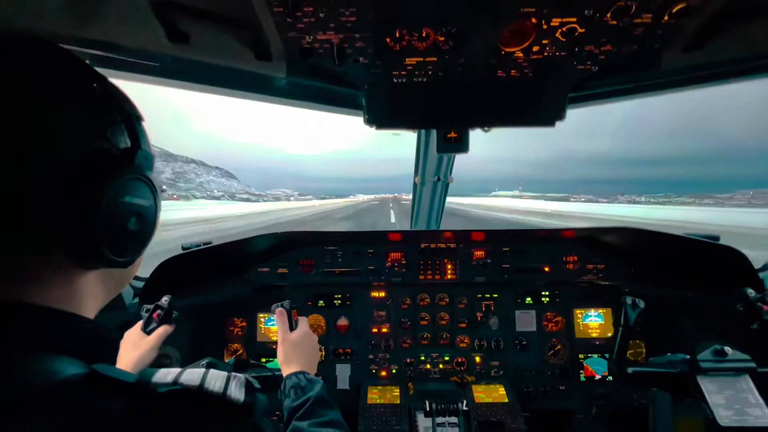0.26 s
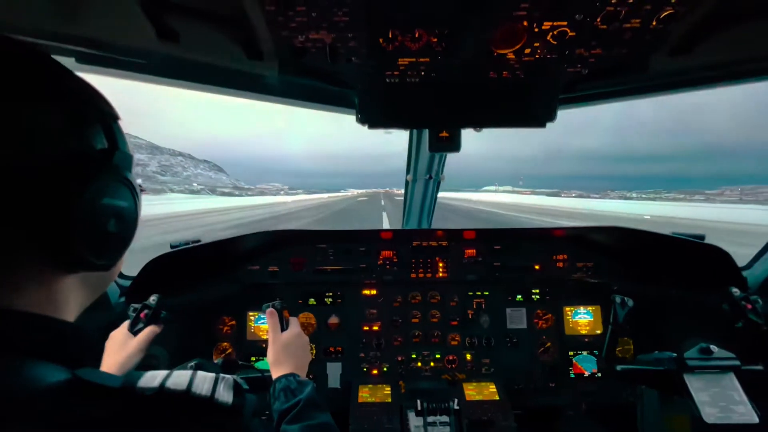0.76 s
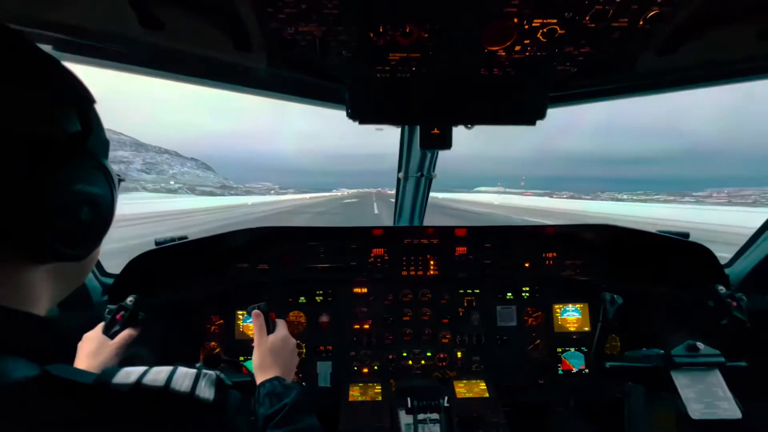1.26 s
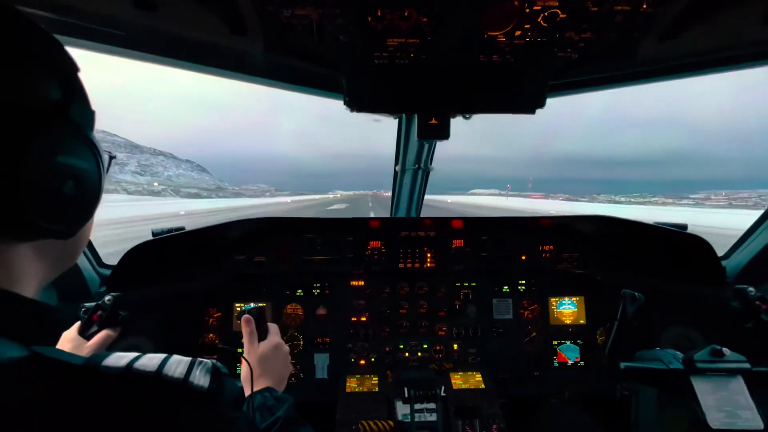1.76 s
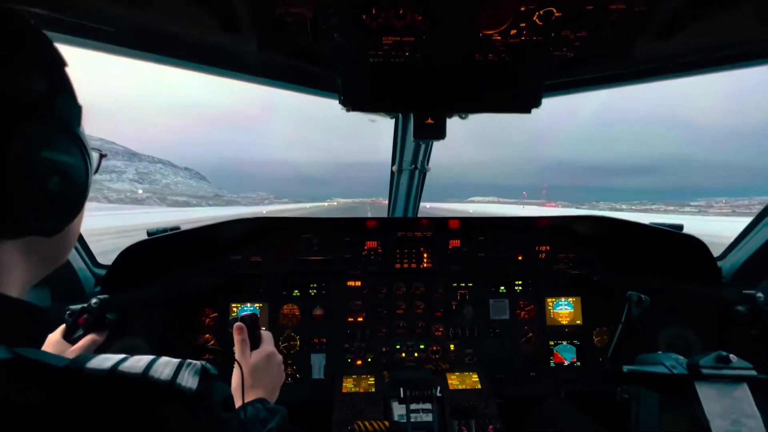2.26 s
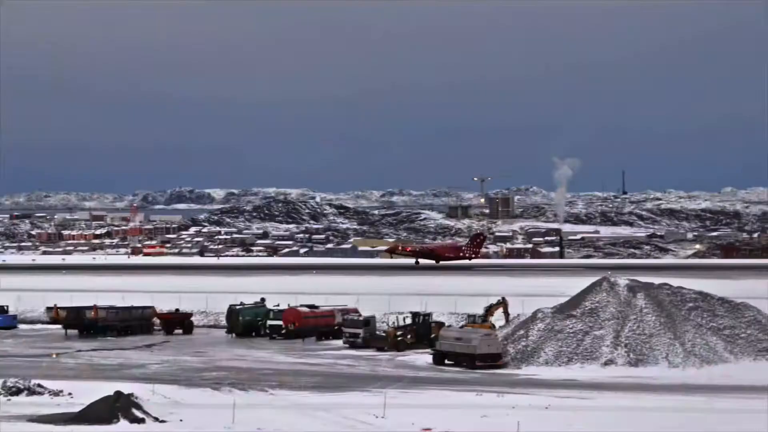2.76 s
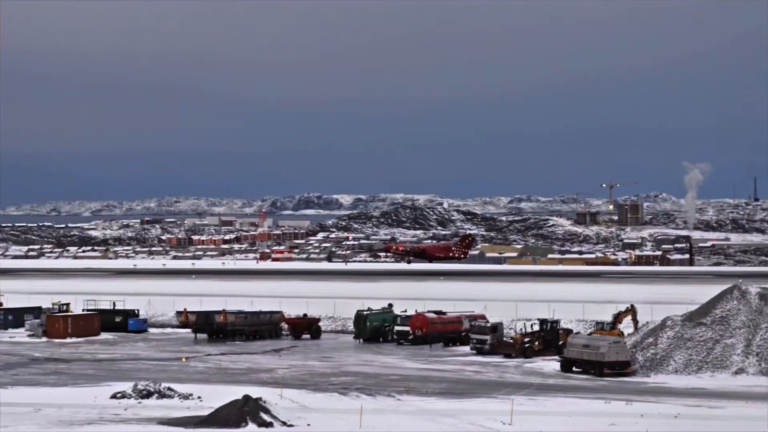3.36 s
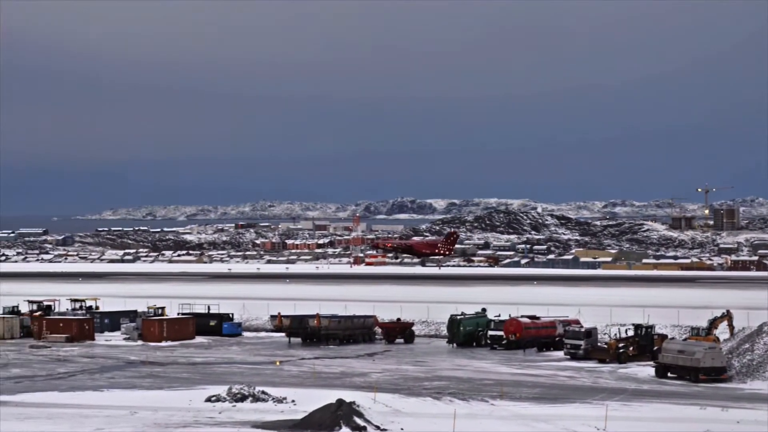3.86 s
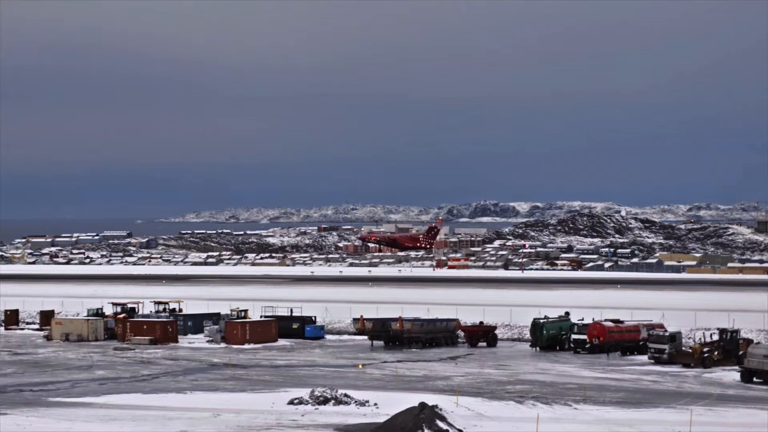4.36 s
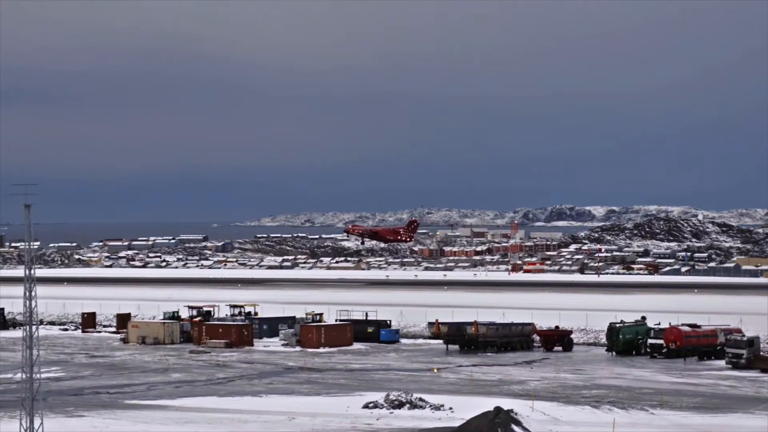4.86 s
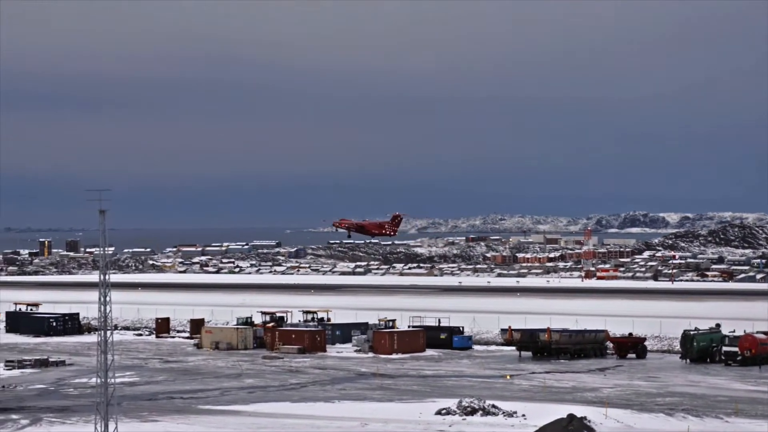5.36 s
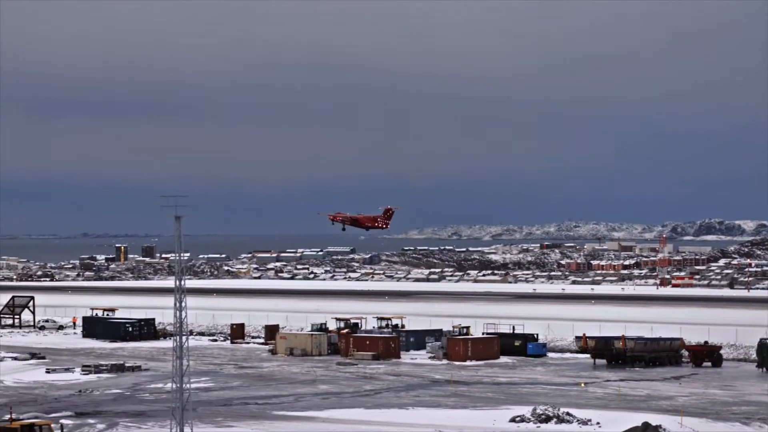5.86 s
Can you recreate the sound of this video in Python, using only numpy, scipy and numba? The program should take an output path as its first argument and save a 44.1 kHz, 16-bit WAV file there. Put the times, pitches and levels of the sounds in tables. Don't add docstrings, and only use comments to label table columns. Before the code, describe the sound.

Inside a small turboprop cockpit, a loud deep propeller hum beats slowly from the first moment, under steady air rush and a thin, hissing high whine. Runway rumble shakes the low end, then fades. A bump and sharp loose-fitting tick come early, followed by two faint ticks. Later, a blended outside layer of the same aircraft passing sinks in pitch. Stereo recorder behind the seats.

```python
import sys
import numpy as np
from scipy import signal
from scipy.fft import rfft, irfft
from scipy.io import wavfile
from scipy.ndimage import uniform_filter1d
from numba import njit

SR = 44100
rng = np.random.default_rng(int(sys.argv[2]) if len(sys.argv) > 2 else 0)


def invert_db(x):
    u = np.asarray(x, float) / 20
    return 10 ** u


def store_wav(level_fs):
    pcm = np.round(np.clip(np.atleast_2d(level_fs), -1, 1) * 32767)
    wavfile.write(sys.argv[1], SR, pcm.T.astype(np.int16))


N = 269892

# (time [s], faster blade rate [Hz], slower blade rate [Hz], level [dB], tilt [dB per multiple])
CABIN = [(0.0, 80.681, 79.512, 0.0, 0.0), (1.5, 80.533, 79.486, -3.9, -2.7),
         (3.0, 80.548, 79.516, -2.8, 1.3), (4.5, 80.623, 79.526, -1.6, -0.5),
         (6.12, 80.467, 79.486, -1.8, -2.9)]
# (time [s], slower blade rate as heard [Hz], level [dB], ground echo delay [ms], tilt [dB per multiple])
PASSING = [(1.0, 79.576, -4.7, 8.44, 4.3), (2.0, 79.567, -5.7, 8.73, 5.3), (2.8, 79.222, -5.5, 9.78, 7.6),
           (3.4, 79.296, -2.7, 8.41, 7.4), (4.0, 78.679, 0.0, 6.68, -3.9), (4.6, 77.895, 0.2, 4.65, -8.0),
           (5.2, 77.58, -9.5, 3.03, 2.7), (5.7, 76.977, -8.9, 2.65, 6.8), (6.12, 76.762, -9.4, 3.11, 6.0)]


def level(x, db):
    return x * invert_db(db) / np.sqrt(np.mean(x ** 2))


def curves(table):
    s, *columns = np.transpose(table)
    return [np.interp(np.arange(N) / SR, s, c) for c in columns]


def on_log_hz(table, hz):
    points_hz, values = np.transpose(table)
    return np.interp(np.log(hz), np.log(points_hz), values)


@njit
def svf(x, hz, width):
    y, b, l = np.empty(len(x)), 0., 0.
    g, k = np.tan(np.pi * hz / SR), width / hz
    for i in range(len(x)):
        v = (b + g * (x[i] - l)) / (1 + g * (g + k))
        b, l, y[i] = 2 * v - b, l + 2 * g * v, k * v
    return y


def walk(rate_hz):
    hold, coarse = int(SR / rate_hz / 64), N // 64 + 2
    held = np.repeat(rng.standard_normal(coarse // hold + 1), hold)
    slow = uniform_filter1d(uniform_filter1d(held, hold), hold)[:coarse]
    return 1.3 * np.interp(np.arange(N) / 64, np.arange(coarse), slow)


def ports(sources, share):
    lag_samples = 8
    common = np.array([np.roll(sources[0], lag_samples), sources[0]])
    return np.sqrt(share) * common + np.sqrt(1 - share) * sources[1:]


def rotors():
    pass_gap_hz = 1.001
    fast, slow = curves(CABIN)[:2]
    far = curves(PASSING)[0]
    return np.array([fast, slow, far, far + pass_gap_hz])


def blade_tone(row, late_cycles):
    ground_share, far_wing_ms = .713, .571
    (k, *db), hz = row, rotors()
    cabin_db, cabin_tilt_db = curves(CABIN)[2:]
    pass_db, echo_ms, pass_tilt_db = curves(PASSING)[1:]
    cycles = k * np.cumsum(hz, axis=1) / SR - np.c_[list(late_cycles)]
    spin = invert_db(np.c_[db]) * np.exp(2j * np.pi * cycles)
    echo_s = (echo_ms + np.array([[0], [far_wing_ms]])) / 1000
    combed = 1 + ground_share * np.exp(-2j * np.pi * k * hz[2:] * echo_s)
    cabin = invert_db(cabin_db + (k - 1) * cabin_tilt_db) * spin[:2].sum(axis=0)
    passing = invert_db(pass_db + (k - 1) * pass_tilt_db) * (combed * spin[2:]).sum(axis=0)
    return cabin + passing


def propellers():
    # (blade multiple, cabin faster [dB], cabin slower [dB], passing slower [dB], passing faster [dB])
    blade_db = [(1, -13.5, -12.5, -12.3, -15), (2, -27, -21.5, -22, -33.5), (3, -37.5, -30.5, -42, -45.5)]
    path_cycles = [(0.4, 0.02, 0.38, 0.09), (0.3, 0.05, 0.28, 0.75), (0.99, 0.26, 0.59, 0.63)]
    blade_lag = [0.12, 0.45, 0.66]
    hold_down = .12
    out, swells, side = 0, [], np.array([[.5], [-.5]])
    for row, late, lag, pan_db in zip(blade_db, path_cycles, blade_lag, (0, -1.6, -.5)):
        pressure = blade_tone(row, late)
        power = np.abs(pressure) ** 2
        swell_db = 10 * np.log10(power / power.mean() + .03)
        swells.append(swell_db)
        gain_db = pan_db * side - hold_down * np.maximum(swell_db, -3) / row[0] ** 2
        out = out + np.sqrt(2) * invert_db(gain_db) * np.real(pressure * np.exp(-1j * lag * side))
    return out, swells[0]


def tone(turns, multiple, db, wander_db, spread, rate_hz):
    drift = walk(rate_hz) + spread * np.array([walk(rate_hz), walk(rate_hz)])
    swell = walk(rate_hz) + .6 * np.array([walk(rate_hz), walk(rate_hz)])
    return np.sqrt(2) * invert_db(db + wander_db * swell) * np.sin(2 * np.pi * multiple * turns + drift)


def overtones():
    # (blade multiple, cabin faster [dB], cabin slower [dB], passing slower [dB], passing faster [dB])
    upper_db = [(4, -45, -47.5, -46, -45), (5, -48, -50, -44.5, -40.5), (6, -45.5, -58, -50, -55),
                (7, -68, -50, -58, -62.5), (8, -59, -71, -73, -62), (9, -58, -59, -75, -66),
                (10, -53.5, -66, -73, -73), (11, -59, -64, -66, -59)]
    blades = np.cumsum(rotors(), axis=1) / SR
    near = invert_db(curves(CABIN)[2])
    far = invert_db(np.clip(curves(PASSING)[1], -5, -1))
    out = 0
    for k, *tone_db in upper_db:
        for turns, one_db, gain in zip(blades, tone_db, (near, near, far, far)):
            out = out + gain * tone(turns, k, one_db, 2.5, .6, 4)
    return out


def gearbox(turns, whine_db, gear_db):
    # (shaft multiple, level [dB])
    gears = [(43.4, -57), (45, -59), (67.4, -62), (69.1, -58), (89.7, -61), (92.3, -63), (94, -65),
             (112, -64), (130.6, -67), (296.5, -66), (304.5, -63)]
    # (blade multiple, level on it [dB], level one shaft turn below [dB])
    whine = [(77, -14, -14), (78, -10, -13), (79, -12, -11), (80, -7, -5), (81, -7, -7), (82, -4, -3),
             (83, 0, 0), (84, -3, -2), (85, -7, -8), (86, -12, -14)]
    gear_hz, whine_hz, whine_width_hz, side_hz = 1604.6, 6630., 410., 6270.
    low = sum(tone(turns, m, db, 3.2, .7, 3) for m, db in gears)
    low = low + invert_db(gear_db + 5) * tone(np.arange(N) / SR, gear_hz, -.7, 1.6, .8, 5)
    lines = 0
    for k, on_db, below_db in whine:
        lines = lines + tone(turns, 4 * k, on_db, 2.5, 1.2, 2.5)
        lines = lines + tone(turns, 4 * k - 1, below_db, 2.5, 1.2, 2.5)
    hiss = []
    for noise in rng.standard_normal((3, N)):
        main = svf(svf(noise, whine_hz, whine_width_hz), whine_hz, whine_width_hz)
        hiss.append(main + 0.74 * svf(svf(noise, side_hz, 900.), side_hz, 900.))
    hiss = ports(np.array(hiss), .4) * (1 + .3 * np.cos(2 * np.pi * 4 * turns))
    flutter_db = 1.1 * walk(14)
    pan_db = np.array([[1.2], [-1.2]])
    return low + invert_db(whine_db + flutter_db + pan_db) * (level(lines, -0.39) + level(hiss, -4.0))


def air(rush_db, buzz_db):
    # (frequency [Hz], density [dB per Hz])
    spectrum = [(53, -28), (90, -21.5), (128, -28.5), (245, -25), (289, -26.5), (477, -26.5), (1270, -39),
                (1630, -38.5), (3380, -45.5), (5240, -50), (6590, -40.5), (9190, -48.5), (10400, -57),
                (13100, -49.5)]
    # (frequency [Hz], share [0-1])
    common_share = [(100, .97), (280, .66), (600, .46), (1500, .4), (3000, .38), (6000, .3), (12000, .2)]
    # (frequency [Hz], level [dB])
    left_louder = [(60, -15), (110, -18), (200, -15.5), (360, 5.5), (650, -1.5), (1170, 5), (2130, 0),
                   (3850, 1.5), (6980, -0.5), (12600, -0.5)]
    out = 0
    for hz in 100 * 2 ** (np.arange(22) / 3):
        bands = np.array([svf(svf(n, hz, hz / 3), hz, hz / 3) for n in rng.standard_normal((3, N))])
        pan_db = on_log_hz(left_louder, hz) * np.array([[.5], [-.5]])
        gust_db = (rush_db - rush_db.mean()) * min(1200 / hz, 1)
        gust_db = gust_db + buzz_db * min(hz / 5000, 1) ** .4 + 1.2 * walk(9)
        gain = invert_db(on_log_hz(spectrum, hz) + gust_db + pan_db)
        out = out + gain * ports(bands, on_log_hz(common_share, hz))
    return level(out, rush_db.mean() + 7)


def wheels(rumble_db):
    # (frequency [Hz], width [Hz], level [dB])
    resonances = [(24, 25, -21), (43.3, 23, -4), (58.9, 5.8, 5.5), (95.2, 21.5, 4), (119.2, 16.5, -3.5),
                  (184, 57, -12)]
    # (time [s], level [dB])
    bumps = [
        (.62, -44),
        (1.311, -29),
        (2.38, -35),
    ]
    shake = level(rng.standard_normal((3, N)), 0) * invert_db(rumble_db + 33.5)
    for s, db in bumps:
        k = int(s * SR)
        shake[:, k:k + 200] += invert_db(db + 35) * np.hanning(200)
    frame = [sum(invert_db(db) * svf(svf(x, hz, w), hz, 1.65 * w) for hz, w, db in resonances) for x in shake]
    return invert_db(-4) * ports(np.array(frame), .985)


def fitting():
    # (time [s], peak level [dB], centre [Hz], width [Hz], 60 dB decay [s])
    ticks = [
        (1.326, -13, 5800, 7500, .04),
        (1.327, -21, 1100, 600, .07),
        (1.329, -22, 2380, 500, .035),
        (1.338, -26, 4200, 3000, .045),
        (1.352, -31, 2800, 2000, .03),
        (1.778, -32, 4000, 3000, .02),
        (2.278, -30, 8600, 1200, .05),
    ]
    out = np.zeros((2, N))
    t = np.arange(4000) / SR
    for s, db, hz, width, t60 in ticks:
        envelope = np.minimum(t / .004, 1) * np.exp(-np.log(1000) * t / t60)
        burst = rng.standard_normal((3, 4000)) * envelope
        burst = ports(np.array([svf(svf(b, hz, width), hz, 1.5 * width) for b in burst]), .3)
        k = int(s * SR)
        out[:, k:k + 4000] += invert_db(db) * burst / np.abs(burst).max()
    return signal.sosfilt(signal.butter(8, 9600, fs=SR, output="sos"), out)


def scene():
    # (time [s], rate [turns per s])
    shaft = [(0, 20.147), (2, 20.14), (3, 20.12), (4.3, 20.09), (6.12, 20.05)]
    # (time [s], whine level [dB])
    load = [(0, -43), (1.4, -41.5), (2.5, -44), (3.1, -39), (3.65, -38), (4.6, -41.5), (5.2, -40.5),
            (5.65, -36.5), (6.05, -44)]
    # (time [s], rumble level [dB])
    rolling = [(0, -25.5), (.6, -22), (.85, -23.5), (1.2, -26.5), (1.8, -26.5), (2.25, -34), (2.65, -31),
               (3.7, -32.5), (4.8, -34), (5.9, -34), (6.12, -34)]
    gear_under_whine_db, gear_buzz, rush_buzz = -15, .35, .17
    turns = np.cumsum(curves(shaft)[0]) / SR
    whine_db = curves(load)[0]
    rush_db = -36.5 - 0.07 * np.arange(N) / SR + walk(3.02)
    drone, swell_db = propellers()
    gear_db = whine_db + gear_under_whine_db + gear_buzz * swell_db
    engines = drone + overtones() + gearbox(turns, whine_db, gear_db)
    return engines + air(rush_db, rush_buzz * swell_db) + wheels(curves(rolling)[0]) + fitting()


def top_cut(x):
    return signal.sosfilt(signal.butter(12, 15780, fs=SR, output="sos"), x)


def record(dry):
    # (frequency [Hz], level [dB])
    mic = [(9600, 0), (10500, -6), (11200, 0), (13400, -1.5), (13600, -24), (14400, -17), (14600, -2),
           (15700, 2)]
    both_ways = np.concatenate([dry, dry[:, ::-1]], axis=1)
    hz = np.maximum(np.arange(N + 1) * SR / (2 * N), 1)
    heard = irfft(rfft(both_ways) * invert_db(on_log_hz(mic, hz)))[:, :N]
    return top_cut(heard)


dry = scene()
out = record(dry)
store_wav(out)
```